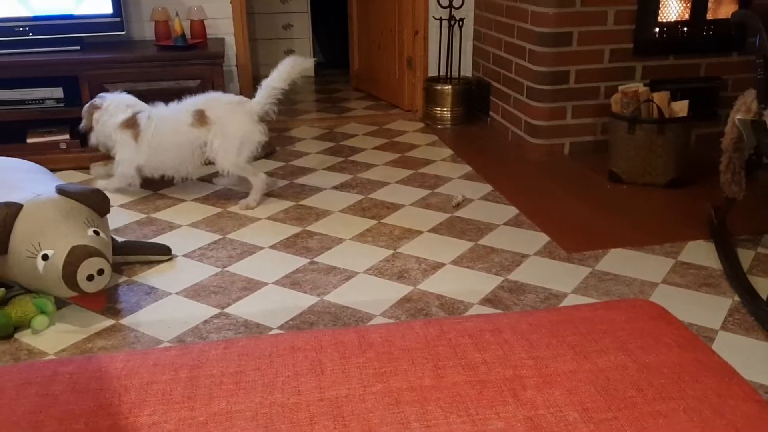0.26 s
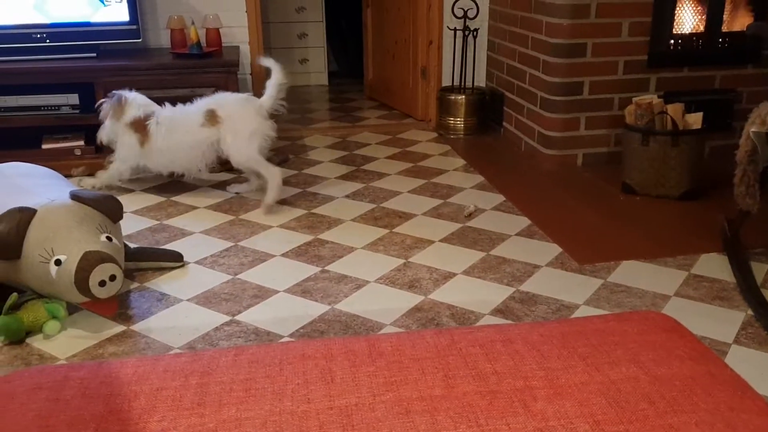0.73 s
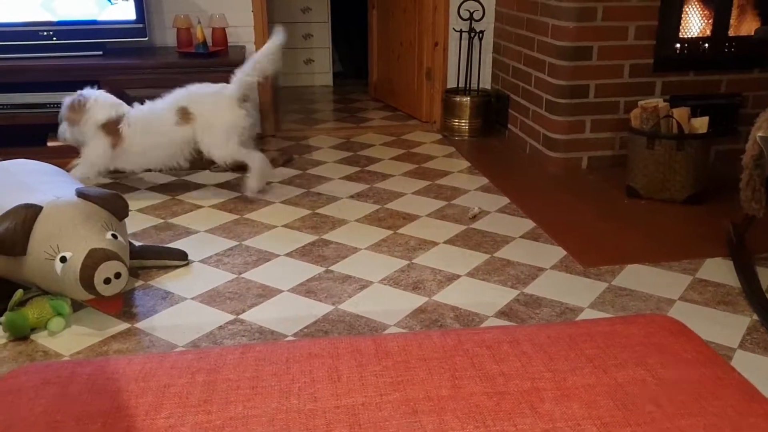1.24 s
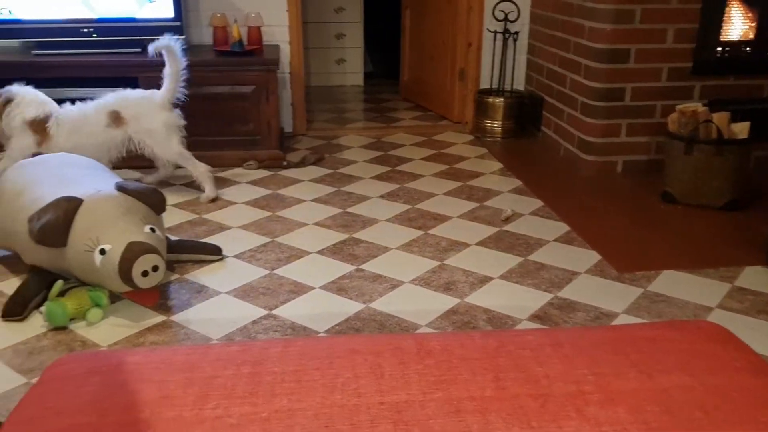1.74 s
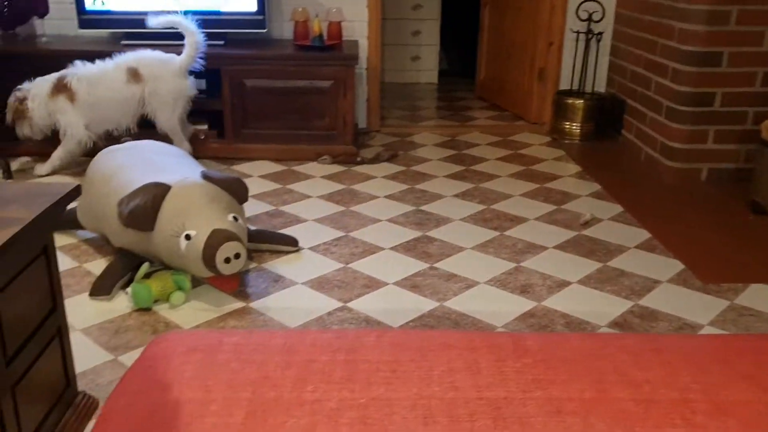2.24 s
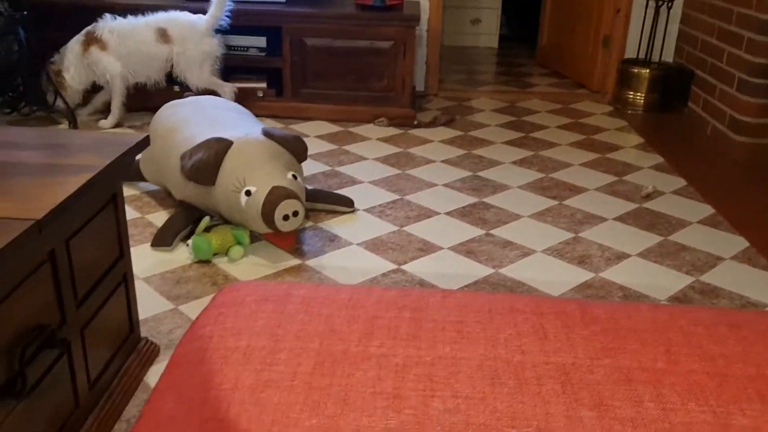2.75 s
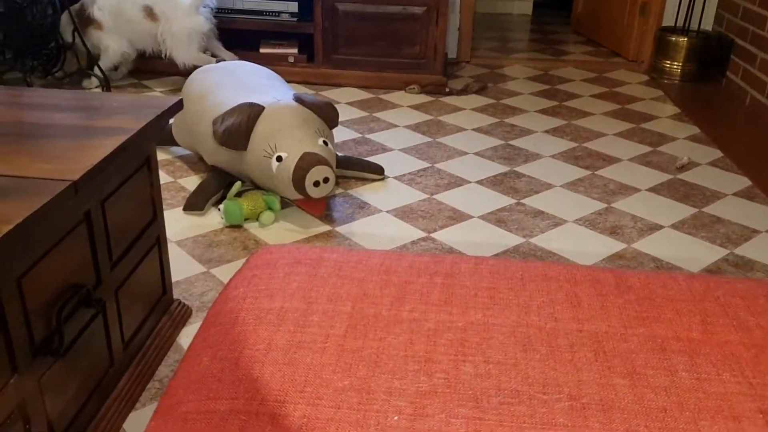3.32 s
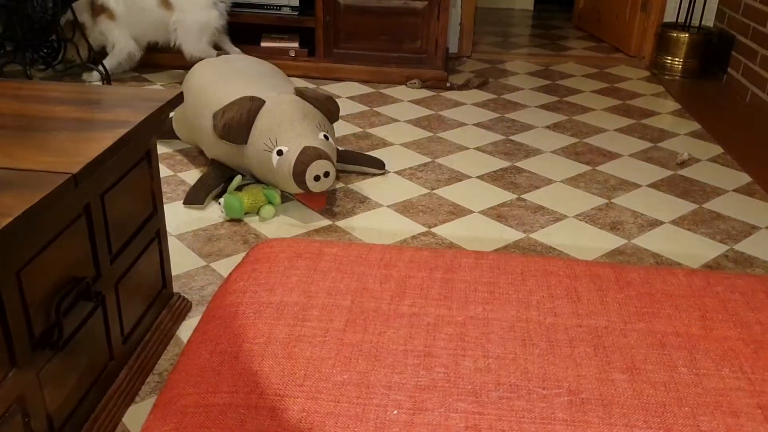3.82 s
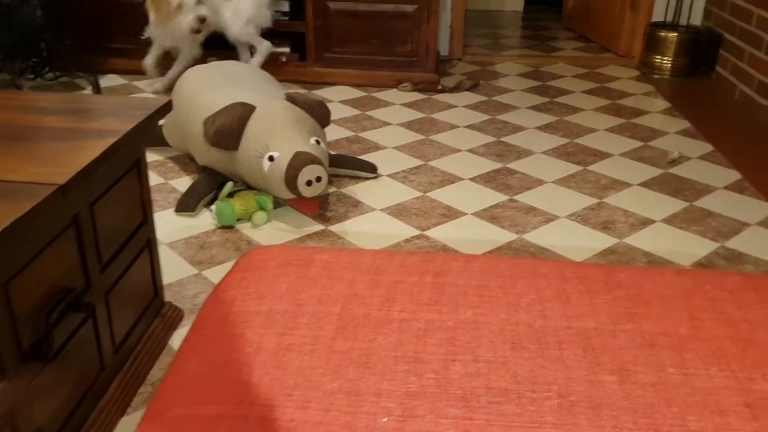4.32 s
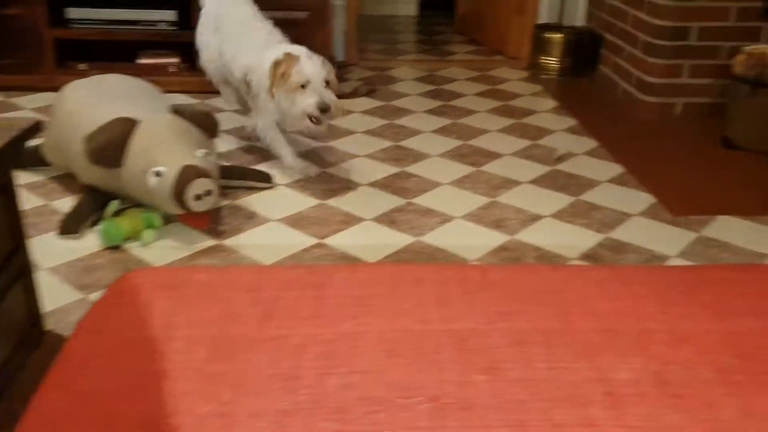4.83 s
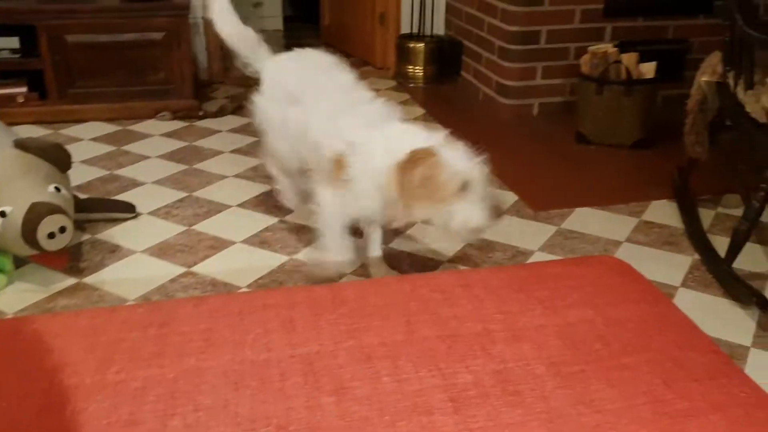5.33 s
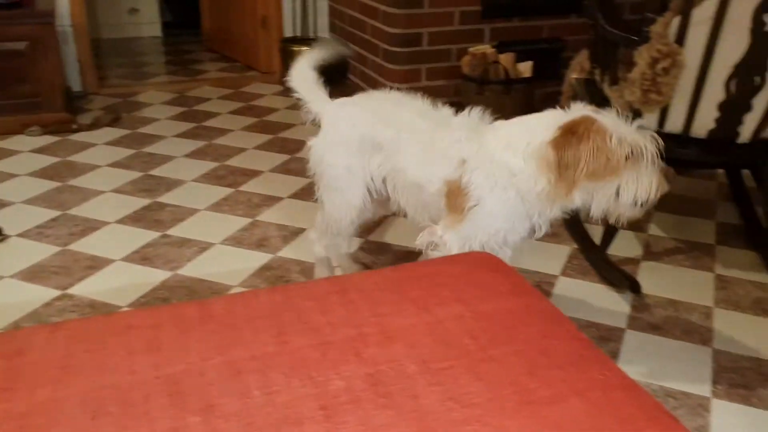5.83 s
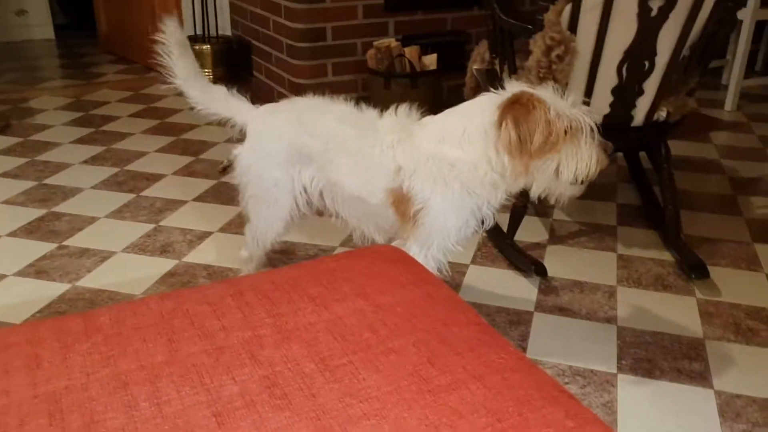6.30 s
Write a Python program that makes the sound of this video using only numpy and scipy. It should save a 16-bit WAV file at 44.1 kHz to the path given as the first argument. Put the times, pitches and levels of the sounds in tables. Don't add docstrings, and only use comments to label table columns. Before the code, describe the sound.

A small dog runs about on a tiled living-room floor, heard by a handheld phone. Claws rattle at once; at 0.3 s a scrabble and pad slap meet a hollow furniture knock, and near 0.7 s comes the hardest wooden thud with bright nail ticks, its panels ringing briefly. Smaller clicks and sliding scrapes follow from 0.85 to 1.8 s, with a low floor bump around 1.2 s and sharper claw taps at 1.9 s. A lighter knock and slap land at 2.04 s. From 2.2 to 4.4 s the steps grow sparse, soft and dull, with a tiny spark snap near 3.2 s. At 4.53-4.63 s a tight burst of claws skitters, followed by a low handling bump. Faint pats fade after 5.5 s into near silence. The bare walls ring for under half a second over a barely audible stove rumble and hiss.

```python
import sys
import numpy as np
from scipy import signal
from scipy.fft import rfft, irfft
from scipy.io import wavfile
from scipy.ndimage import uniform_filter1d

SR = 44100
rng = np.random.default_rng(int(sys.argv[2]) if len(sys.argv) > 2 else 0)


def dump(signal):
    limited = np.clip(np.atleast_2d(signal).T, -1, 1)
    pcm = np.round(limited * 32767).astype(np.int16)
    wavfile.write(sys.argv[1], SR, pcm)


def voltage_ratio(decibels):
    exponent = np.asarray(decibels, float) / 20
    return 10 ** exponent


N = 289408

# frequency in Hz, level in dB per Hz.
AIR = [(15, -50), (25, -13), (66, -17), (97, -2.5), (200, -15.5), (405, -27.5), (531, -47.5), (624, -32.5),
       (1330, -41.5), (3620, -42), (9070, -44.5), (14400, -40), (16000, -50.5)]
AIR_DB = -46.5
STOVE_HZ, STOVE_DB = 84.7, -59.5

# time in s, peak in dB, low edge in Hz, build-up in ms.
BUMPS = [(0.009, -41.5, 80.6, 32), (1.197, -37, 55.15, 30), (1.449, -43.5, 89.4, 130), (1.684, -39, 50, 79),
         (1.919, -45.5, 218, 49.6), (4.61, -44.5, 146.8, 23), (5.188, -45.5, 85.3, 47),
         (.35, -29.5, 150, 20)]
BUMP_TOP_HZ = 347.1
# time in s, peak in dB, low edge in Hz, build-up in ms.
GRIP = [
    (4.75, -25.5, 27.93, 58),
    (5.2, -35, 30.2, 41),
]
GRIP_TOP_HZ = 54.7

# time in s, peak in dB, sharpness in dB, ring in Hz, scrabble length in ms.
DASH = [(0.0095, -29.5, -16, 2760, 1.6), (0.0145, -32, -19, 2740, 1.7), (0.0192, -28.5, -24, 2590, 2.2),
        (0.3185, -28, -7, 2300, 9.5), (0.3303, -18.5, 2, 2380, 13.5), (0.4654, -33.5, -0.5, 2840, 4.9),
        (0.4876, -23.5, 1, 2350, 3.4), (0.4968, -31, -0.5, 2440, 9.8), (0.6540, -33.5, 7.5, 3020, 5),
        (0.6609, -26.5, 6, 2130, 5.5), (0.6875, -13, 0, 2520, 4.4), (0.696, -16, -3, 2518, 2.8),
        (0.8446, -22, -10, 2510, 13), (0.857, -25.5, -10.5, 2230, 8), (0.8619, -31, 4.5, 3100, 2.7),
        (0.9732, -29.5, 1, 2630, 2.7), (1.055, -33, -3, 2970, 4), (1.0596, -27.5, -13, 3200, 3.4),
        (1.1216, -36.5, -17, 3020, 8.2), (1.1746, -39, 1.5, 2670, 26), (1.2705, -30.5, -4, 3120, 2.9),
        (1.2750, -43, 0, 3000, 4.5), (1.336, -39, -15, 2600, 6), (1.4920, -38, -2.5, 2600, 1.2),
        (1.5722, -37.5, 3, 3160, 3), (1.5778, -36, -7, 2150, 2.8), (1.6409, -35.5, -23, 2860, 3.2),
        (1.7220, -34.5, -6.5, 2900, 10), (1.7678, -40, 12.5, 2750, 11), (1.7870, -33.5, 6.5, 2080, 1.6),
        (1.796, -34, 5.5, 2390, 4), (1.8715, -35.5, 6, 2400, 2.1), (1.8771, -31.5, -10, 2460, 4),
        (1.9080, -19, -5, 2660, 2.5), (2.0278, -29, 3, 2840, 1.2), (2.1915, -32, -1, 2820, 1.4)]
# time in s, peak in dB, sharpness in dB, ring in Hz, scrabble length in ms.
WANDER = [(2.3204, -35.5, 0.5, 2580, 2), (2.538, -44, 8, 2750, 11), (2.7806, -51.5, 0, 2430, 3.5),
          (2.7875, -49, 0.5, 2470, 5), (2.96, -51, -4, 2750, 13), (3.3046, -64.5, 8, 3830, 12),
          (3.5024, -45.5, 0, 2450, 19), (3.6564, -58, 10, 2990, 5.6), (4.059, -56.5, 1, 2730, 5),
          (4.0691, -60, 7.5, 3300, 7.6), (4.1683, -63, 14.5, 3260, 60), (4.535, -31.5, -3, 2820, 9.9),
          (4.5465, -30.5, -4, 3160, 23), (4.5896, -28, 5.5, 2800, 5.3), (4.598, -24, -3, 2840, 8.9),
          (4.611, -32, 3.5, 2780, 8.4), (4.9974, -70.5, 10.5, 2800, 9.5), (5.0114, -70, 12, 2870, 8),
          (5.2222, -45.5, 0.5, 2660, 4), (5.3707, -81, -4.5, 2560, 7.3), (5.536, -55, 8.5, 2650, 14),
          (6.047, -68.5, 9.5, 2976, 13)]
FIRST_NAIL, FIRST_NAIL_MS = .3, 3.
SCRAPE_MS = 3.7
TIP_OVER_HORN = 1.4
BRIGHT_DB, BRIGHT_FOLLOWS = -7.5, 0.29
AIRY_DB, AIRY_FOLLOWS = -17.5, 0.95
HIDDEN_S, HIDDEN_AIRY_DB = (2.15, 4.4), -11

# start of the
# hold in s, time held in s, hiss in dB, sharpness in dB.
SLIDES = [(0.01, 0.0066, -42, 7.5), (0.478, 0.039, -37.5, 5.5), (0.55, 0.4, -45, -6),
          (0.93, 0.11, -43.5, -3.5), (1.05, .25, -45.5, -7), (1.502, 0.12, -56.5, 4),
          (1.649, 0.18, -45.5, 3), (1.919, 0.088, -41.5, 7.5), (2.002, 0.037, -40, -10),
          (2.09, 0.12, -46.5, -20), (2.2, 0.048, -49, 8), (2.33, 0.029, -48, -12.5),
          (2.57, 0.04, -57, -9.5), (2.748, 0.31, -66, 3), (3.178, 0.045, -54.5, 1.5),
          (3.26, 0.029, -61, -1.5), (3.529, 0.0072, -51, -3.5), (3.6, 0.046, -57.5, 3),
          (3.71, .02, -72.5, -26.5), (4.088, 0.0033, -62.5, -18), (4.182, 0.052, -71, -18),
          (4.519, 0.006, -50, 0), (4.68, 0.029, -46, -36), (4.907, 0.0084, -66.5, -19),
          (5.02, 0.11, -73, 6), (5.248, .01, -52.5, -6.5), (5.378, 0.013, -59, -27),
          (5.55, 0.02895, -58.5, 2.5), (5.939, .03, -82, -13.5), (6.05, .05, -73, 8),
          (0.142, 0.22, -58.5, 9.5), (1.36, 0.11, -52.5, 1.5), (1.85, 0.042, -51, -14),
           (2.42, .06, -74, -10), (2.62, 0.046, -77.5, -2), (3.519, .03, -67, -17.5),
           (4.26, .07, -66.5, 10.5), (4.33, 0.043, -85, -16), (4.46, 0.041, -60, 8), (4.83, 0.066, -62, 18),
           (5.01, 0.053, -66.5, 20.5), (5.11, 0.061, -71, -6), (5.3, 0.051, -69.5, -8.5),
           (5.57, 0.044, -73, -4.5), (4.85, 0.04, -60.5, -26), (4.06, 0.037, -64, 2.5),
           (5.19, 0.0092, -71.5, 26), (5.621, 0.03, -69.5, 19.5), (6.44, 0.028, -83, -1.5),
           (1.1, .15, -66.5, 22), (1.33, .15, -69, 23), (1.5, .06, -63.5, 20), (1.62, .1, -76, 22),
           (4.7, .06, -69, 18), (3.2, .08, -65.5, -15)]
# frequency in Hz, level in dB per Hz.
TILE = [(760, -43.5), (1300, -10.5), (2520, -6.5), (2890, -11.5), (3310, -5.5), (7670, 3.5), (8790, -15),
        (16000, -34.5)]
SLIDE_RISE_DB_PER_S, SLIDE_FALL_DB_PER_S = 499, 194.5
RUB_DB, RUB_FOLLOWS = -5, 0.18
FUR_DB, FUR_FOLLOWS = -8, 0.69

# time in s, peak in dB, ring in Hz, build-up in ms.
PADS = [(0.016, -42, 1420, 5.14), (0.335, -13, 700, 27), (0.489, -24.5, 1650, 12),
        (0.543, -34.5, 1460, 8.9), (0.675, -18.5, 705, 19.6), (0.849, -37, 870, 8.1),
        (1.058, -34, 1640, 2.9), (1.174, -60, 1250, 1.7), (1.493, -38, 1430, 2.1), (1.574, -33.5, 1550, 10),
        (1.773, -33.5, 1580, 1.3), (1.907, -29.5, 1380, 34), (2.045, -19.5, 1290, 1.5),
        (2.196, -31, 1454, 3.4), (2.544, -41.5, 1617, 16), (2.784, -59, 1644, 22), (3.21, -54, 1106, 45),
        (3.51, -49.5, 1290, 6.5), (3.69, -48.5, 1004, 28), (4.073, -40, 1003, 7.7),
        (4.176, -43.5, 923, 9.6), (4.545, -31.5, 1350, 3.9), (4.594, -22, 1393, 19.6),
        (4.878, -43, 1290, 18), (4.908, -40.5, 624, 8.7), (5.059, -61, 1012, 15.4), (5.115, -54, 920, 4.3),
        (5.228, -41, 831, 3.7), (5.345, -39, 1253, 15), (5.543, -44, 785, 10.2), (5.925, -61, 877, 25)]
PAD_RING_WIDTH_HZ = 100
NEAR_S = 3.1

# time in s, peak in dB, ping in Hz.
TICKS = [(0.0181, -19.5, 2660), (0.3208, -28, 7100), (0.4878, -27, 7300), (0.653, -15, 6400),
         (1.0600, -19, 4770), (1.275, -37, 4700), (1.719, -38, 6000), (1.9085, -20.5, 4570),
         (2.025, -19, 4140), (2.193, -23.5, 3300), (2.322, -28.5, 4100), (2.5369, -28, 4800),
         (2.538, -35, 7040), (0.687, -15.5, 3930), (0.7224, -13, 2460), (1.4925, -50, 3530),
         (1.5720, -32, 4600), (2.7825, -42.5, 3660), (2.958, -49.5, 3550), (3.6576, -46, 4950),
         (4.5342, -33, 6900), (4.6205, -26, 4010), (4.588, -18, 4430), (5.2223, -42.5, 3100),
         (4.5433, -32, 3390), (4.561, -33, 3310), (4.601, -31, 4060), (4.612, -28, 4270),
         (4.6135, -23, 4500), (4.6303, -29, 4340), (0.6913, -16, 2430), (0.7, -18, 3130),
         (0.736, -22.5, 2480), (0.845, -25.5, 2800), (1.1216, -30, 4800), (1.0664, -41, 3200)]
TICK_WIDTH = .3
DIRECT_TICK = 0.56

# time in s,
# peak in dB, frequency in Hz, width in Hz, build-up in ms.
RINGS = [(0.329, -30, 450, 340, 4.3), (0.345, -29, 355, 43, 8.9), (0.352, -21, 670, 150, 7.3),
         (0.672, -26.5, 600, 300, 5), (0.691, -19, 1250, 440, 5.3), (0.693, -25, 3300, 280, 6),
         (0.696, -13.5, 900, 450, 7), (0.76, -35, 260, 63, 30), (0.9, -40.5, 260, 80, 30),
         (1.1, -42, 4100, 300, 4.8), (1.19, -29, 48, 30, 30), (1.205, -34, 138, 140, 8.6),
         (1.274, -35.5, 4900, 300, 6), (1.276, -35, 7360, 500, 6), (1.68, -25.5, 75, 58, 25),
         (2.036, -27.5, 700, 500, 3.2), (2.047, -24, 960.3, 166, 4), (2.05, -34, 1600, 150, 8),
         (2.075, -30, 600, 370, 16), (2.782, -53, 3600, 110, 11), (2.957, -53, 2410, 200, 8),
         (3.2, -56, 1400, 260, 20), (3.22, -51, 2160, 150, 20), (3.26, -56.5, 1080, 154, 12),
         (3.51, -57.5, 853, 400, 20), (4.55, -32, 1470, 200, 8), (4.597, -23, 2780, 160, 6),
         (4.599, -38, 7600, 600, 6.5), (4.601, -27.5, 4400, 890, 6.3), (4.62, -30, 7240, 560, 6),
         (4.725, -28, 40, 20, 29), (5.055, -47, 1040, 40, 35), (5.11, -49, 960, 50, 20),
         (5.22, -48, 2100, 500, 16), (5.36, -60, 2920, 1100, 26)]

# time in s, peak in dB, build-up in ms.
THUDS = [
    (0.341, -16, 11.6),
    (0.686, -9.5, 16.2),
    (2.043, -18.5, 7.8),
]
# frequency in Hz, width in Hz, level in dB.
HUMS = [
    [(242, 21, -9.5), (360, 6.2, 5.5), (700, 35, -7.0), (1265, 31, -17.0), (1380, 130, -6.0)] + [(481.5, 21, -2.5), (158, 28, -13.5), (810, 37, -4.0)],
    [(390, 18, -23), (565.0, 13, -9.5), (740, 79, 14), (1290, 51, -15.5)] + [(218, 27, -14.5), (970, 28, 1.0)],
    [(278.3, 11.3, 1.5), (400, 30.5, 12), (545, 190, 10), (705, 160, -5), (814, 45, -14), (1244, 64, -33)],
]
# frequency in Hz, level in dB, time to fall 60 dB in s.
PANELS = [
    [(154, -9, 0.13), (214.8, 3.5, 0.22), (272, -5.5, .25), (371, 5, .22), (569, -3, .3), (660, -2, .2),
     (706, -4.5, 0.25), (855, -6, 0.45)],
    [(206.5, -8.5, .25), (342, -21, 0.25), (527, -6, .25), (560, -6.5, 0.21), (708, 0.5, .35),
     (775.6, -5, 0.31), (1002, -3.5, 0.43), (1120, -10, 0.17)],
    [(238, -5.5, 0.25), (401.3, 4, 0.19), (576, -4, 0.19), (716, 0, 0.4), (854, -5, 0.2), (1296, -8, 0.14),
     (1650, -8.5, .2)],
]
PANEL_SWELL = 0.4
# distance in Hz, share of the level.
TWINS = [(0, 1), (23, .7), (-31, .5)]

# time in s, peak in dB, ring in Hz, build-up in ms.
MORE_STEPS = [(0.345, -22.5, 545, 21), (0.5, -23, 1687, 8.3), (0.543, -37, 1595, 9.6), (0.69, -41, 560, 12),
              (2.04, -33, 1670, 8), (0.69, -39, 2100, 7.3), (2.042, -28, 400, 11), (2.2, -42, 393, 37),
              (2.38, -51, 450, 20), (2.544, -39, 2290, 15), (2.57, -53.5, 716, 21), (2.783, -50.5, 1600, 12),
              (2.85, -56, 1607, 30), (2.955, -64, 1496, 8.4), (2.971, -57, 2576, 25), (3.52, -50, 496, 19),
              (4.18, -44.5, 910, 7.8), (4.24, -53.5, 900, 26), (4.95, -55, 640, 30), (5.055, -64, 1036, 20),
              (5.11, -68, 937, 16.6), (5.115, -57.5, 1600, 13), (5.228, -43, 1610, 5.2), (5.361, -45, 360, 15),
              (5.38, -44.5, 640, 17), (5.33, -43.5, 1675, 19), (5.56, -63, 1703, 17), (5.945, -67, 1200, 21)]
MORE_STEP_WIDTH_HZ = 105

# time in s, peak in dB.
SNAP = [
    (1.3962, -40),
    (3.1742, -37),
]

# frequency in Hz, time to fall 60 dB in s.
ROOM_T60 = [(100, 1), (400, 0.42), (1000, 0.45), (3000, 0.37), (7000, 0.36), (14000, 0.22)]
# delay in ms, level in dB.
ECHOES = [(2.2, -10), (5.5, -4), (9.5, -5), (14, -9), (21, -11)]
# time in s, left over right in dB.
PAN = [(0.0, 3), (0.99, 2), (1.421, 2.5), (2.299, 2.5), (2.589, 3), (4.15, 2.5), (4.219, 2), (6.19, 2),
       (6.56, 4.5)]
# frequency in Hz, level in dB.
MIC = [(60, -18.5), (150, 5.5), (1600, 1), (2000, -5.5), (2500, 0.5), (5000, 3), (6200, 0.5), (7600, 2.5),
       (8900, -1), (10500, 2), (13000, 4.5), (15800, -5.5)]
LEFT_LEAD_S = .00014
PORT_GAP_M = .15
ROOM_LEFT_DB = 1.5
SUPPRESSION_DB = 7.
CUTOFF_HZ = 16200


def rms_one(x):
    return x / np.sqrt(np.mean(x ** 2) + 1e-30)


def at_hz(points, hz):
    table_hz, values = np.transpose(points)
    return np.interp(np.log(np.maximum(hz, 1)), np.log(table_hz), values)


def colour(x, points):
    hz = np.fft.rfftfreq(x.shape[-1], 1 / SR)
    return irfft(rfft(x) * voltage_ratio(at_hz(points, hz)), x.shape[-1])


def two_ports(size):
    alike = .98 * np.sinc(2 * np.fft.rfftfreq(size, 1 / SR) * PORT_GAP_M / 343)
    mid, side = rfft(rng.standard_normal((2, size)))
    spectra = np.sqrt(1 + alike) * mid + np.sqrt(1 - alike) * side * [[1], [-1]]
    return rms_one(irfft(spectra, size))


def band(x, low_hz, high_hz):
    return signal.sosfilt(signal.butter(2, [low_hz, high_hz], "band", fs=SR, output="sos"), x)


def resonate(x, hz, width_hz):
    r = np.exp(-np.pi * width_hz / SR)
    feedback = [1, -2 * r * np.cos(2 * np.pi * hz / SR), r * r]
    return signal.lfilter((1 - r * r) / 2 * np.array([1, 0, -1]), feedback, x)


def grains(size, per_s, spread_db):
    sizes = voltage_ratio(spread_db * np.minimum(rng.exponential(1, size), 4)) * rng.choice([-1, 1], size)
    return rms_one(sizes * (rng.random(size) < per_s / SR))


def push(ms, per_s):
    t = np.arange(8192) * 1000 / SR / max(ms, 1)
    return grains(len(t), per_s, spread_db=3) * t * np.exp(-1.5 * t)


def place(out, s, sound, db):
    i = max(round(s * SR), 0)
    full = out.copy()
    full[i:i + len(sound)] += (voltage_ratio(db) * sound / np.sqrt(np.sum(sound ** 2)))[:N - i]
    return full


def still_room():
    draught = resonate(two_ports(N), STOVE_HZ, width_hz=36.0)
    draught = rms_one(resonate(draught, STOVE_HZ, width_hz=13.0))
    hiss = rms_one(colour(two_ports(N), AIR))
    return voltage_ratio(SUPPRESSION_DB) * (voltage_ratio(STOVE_DB) * draught + voltage_ratio(AIR_DB - 15.5) * hiss)


def room_answer(wet_db):
    size = 2 ** 15
    t = np.arange(size) / SR
    edges = 60 * 2 ** np.arange(0, 8.4, .75)
    diffuse, tail = [two_ports(size), two_ports(size)], 0
    for k, (low, high) in enumerate(zip(edges, edges[1:])):
        t60 = at_hz(ROOM_T60, np.sqrt(low * high))
        tail = tail + band(diffuse[k % 2], low, high) * voltage_ratio(-60 * t / t60)
    answer = tail * (1 - np.exp(-t / .004))
    answer = voltage_ratio(wet_db) * answer / np.sqrt(np.sum(answer ** 2) / 2)
    answer[[0, 1], [0, round(LEFT_LEAD_S * SR)]] += 1.2
    for ms, db in ECHOES:
        lags = (ms * SR / 1000 + rng.integers(0, 30, 2)).astype(int)
        answer[[0, 1], lags] += voltage_ratio(db) * rng.choice([-1, 1])
    return answer


def in_room(sound, wet_db):
    return signal.fftconvolve(sound[None], room_answer(wet_db), axes=1)[:, :N]


def bumps(spots):
    out = np.zeros((spots, N))
    for k, (s, db, low_hz, ms) in enumerate(BUMPS + GRIP):
        top_hz = BUMP_TOP_HZ if k < len(BUMPS) else GRIP_TOP_HZ
        bump = band(push(ms, per_s=1200.0), low_hz, top_hz)
        out[k % spots] = place(out[k % spots], s - .01, bump, db + 18.5)
    return out


def claws(spots):
    out, t = np.zeros((spots, N)), np.arange(4096) * 1000 / SR
    for k, (s, db, sharp_db, hz, ms) in enumerate(DASH + WANDER):
        fade = np.exp(-t / max(ms, .3)) * (.4 + .6 * np.minimum(1, t / 2.5))
        nails = grains(len(t), per_s=4000., spread_db=2.5) * fade
        nails[0] += FIRST_NAIL * min(1, FIRST_NAIL_MS / ms) * np.sqrt(np.sum(nails ** 2))
        scrape = 1.2 * rms_one(nails) + rms_one(push(SCRAPE_MS, per_s=47000.0)[:len(t)])

        knock = rms_one(resonate(nails, hz, width_hz=690.0)) + 0.4 * rms_one(band(nails, 1700, 3000))
        tip = rms_one(resonate(nails, TIP_OVER_HORN * hz, width_hz=1200.0))
        tick = rms_one(tip + 0.39 * rms_one(band(nails, 2900, 5500)))
        bright_db = BRIGHT_DB + BRIGHT_FOLLOWS * sharp_db
        tick += voltage_ratio(bright_db) * rms_one(band(scrape, 5060, 7700))
        hidden = HIDDEN_S[0] < s < HIDDEN_S[1]
        airy_db = AIRY_DB + AIRY_FOLLOWS * sharp_db + HIDDEN_AIRY_DB * hidden
        tick += voltage_ratio(airy_db) * rms_one(band(scrape, 9000, 12000))

        tick_db = db + sharp_db + 14.0 + 20 * np.log10(np.std(tick))
        out[k % spots] = place(out[k % spots], s - .0008, knock, db + 19.0)
        out[k % spots] = place(out[k % spots], s - .0008, tick, tick_db)
    return out


def slide():
    t, gains = np.arange(0, N, 64) / SR, 0
    for s, held_s, db, sharp_db in SLIDES:
        rise_db, fall_db = SLIDE_RISE_DB_PER_S * (t - s), SLIDE_FALL_DB_PER_S * (s + held_s - t)
        shape_db = np.minimum(0, np.minimum(rise_db, fall_db))
        layers_db = np.array([[0], [RUB_DB - RUB_FOLLOWS * sharp_db], [FUR_DB + FUR_FOLLOWS * sharp_db]])
        gains = gains + voltage_ratio(db - 10.5 + layers_db + shape_db)
    grit = grains(N, per_s=3300.0, spread_db=3.0)
    hiss = rms_one(band(colour(grit, TILE), 1400, 3500))
    rub = rms_one(band(grains(N, per_s=300.0, spread_db=4.0), 180, 2800))
    time = np.arange(N) / SR
    shade = voltage_ratio(HIDDEN_AIRY_DB * ((time > HIDDEN_S[0]) & (time < HIDDEN_S[1])))
    fur = rms_one(band(grit, 3600, 7800)) + 0.55 * shade * rms_one(band(grit, 8500, 16000))
    return sum(np.interp(time, t, gain) * layer for gain, layer in zip(gains, [hiss, rub, fur]))


def pads(spots):
    out = np.zeros((spots, N))
    for k, (s, db, hz, ms) in enumerate(PADS):
        slap = push(ms, per_s=4000.0)
        ring = resonate(resonate(slap, hz, PAD_RING_WIDTH_HZ), hz, PAD_RING_WIDTH_HZ)
        pat = (1.05 if s < NEAR_S else 1.9) * rms_one(band(slap, 0.54 * hz, 1.5 * hz))
        out[k % spots] = place(out[k % spots], s - .003, rms_one(ring) + pat, db + 12.5)
    return out


def ticks():
    out, tap = np.zeros(N), np.arange(300) == 0
    for s, db, hz in TICKS:
        ping = resonate(resonate(tap, hz, TICK_WIDTH * hz), hz, TICK_WIDTH * hz)
        out = place(out, s, ping, db + 4.5)
    return out


def rings():
    out = np.zeros(N)
    for s, db, hz, width_hz, ms in RINGS:
        ring = resonate(resonate(push(ms, per_s=6000.0), hz, width_hz), hz, width_hz)
        out = place(out, s - .003, ring, db + 16.5)
    return out


def thuds(spots):
    out = np.zeros((spots, N))
    for k, ((s, db, ms), hums) in enumerate(zip(THUDS, HUMS)):
        blow = push(ms, per_s=1600.0)
        hum = sum(voltage_ratio(level_db) * resonate(blow, hz, width_hz + 45) for hz, width_hz, level_db in hums)
        knock = rms_one(hum) + .7 * rms_one(band(band(blow, 300, 1900), 200, 2500))
        out[k] = place(out[k], s - .006, knock, db + 15.5)
    return out


def panels():
    out, t = np.zeros(N), np.arange(SR // 2) / SR
    for (s, db, ms), modes in zip(THUDS, PANELS):
        ring = 0
        for hz, level_db, t60 in modes:
            for apart_hz, share in TWINS:
                tone = np.sin(2 * np.pi * ((hz + apart_hz) * t + rng.random()))
                ring = ring + voltage_ratio(level_db - 60 * t / t60) * share * tone
        swell = 1 - np.exp(-(t * 1000 / (PANEL_SWELL * ms)) ** 2)
        i = round(s * SR)
        out[i:i + len(t)] += voltage_ratio(db - 14) * ring * swell
    return out


def more_steps():
    out = np.zeros(N)
    for s, db, hz, ms in MORE_STEPS:
        ring = resonate(resonate(push(ms, per_s=3800.0), hz, MORE_STEP_WIDTH_HZ), hz, 2 * MORE_STEP_WIDTH_HZ)
        out = place(out, s - .003, ring, db + 16)
    return out


def snap():
    out, click = np.zeros(N), band(np.arange(200) == 0, 1200, 12000)
    for s, db in SNAP:
        out = place(out, s, click, db + 6)
    return out


def scene():
    sources = bumps(spots=5) + claws(spots=5) + pads(spots=5) + thuds(spots=5)
    nail_ticks = ticks()
    sources[4] += slide()
    sources[3] += nail_ticks
    heard = sum(in_room(x, wet_db=3.0) for x in sources)
    heard += in_room(more_steps(), wet_db=1.0) + in_room(rings(), wet_db=-4.0)
    heard += snap() + panels() + DIRECT_TICK * nail_ticks
    heard = colour(heard, MIC)
    left_right = np.array([[1], [-1]])
    pan_db = np.interp(np.arange(N) / SR, *np.transpose(PAN))
    panned = heard * voltage_ratio(np.clip(pan_db, -6, 6) / 2 * left_right)
    return panned + still_room() * voltage_ratio(ROOM_LEFT_DB / 2 * left_right)


def low_pass(x):
    return signal.sosfilt(signal.butter(12, 16470, fs=SR, output="sos"), x)


def record(dry):
    cells = signal.stft(dry, nperseg=256)[2]
    power = uniform_filter1d(np.mean(abs(cells) ** 2, 0), size=5, axis=0)
    power = signal.lfilter([.12], [1, -.88], power, axis=1)
    steady = np.percentile(power, 8, axis=1, keepdims=True)
    gain = np.maximum(voltage_ratio(-SUPPRESSION_DB), 1 - 7.9 * steady / (power + 1e-20))
    quiet = signal.istft(cells * gain, nperseg=256)[1][:, :N]
    rounded = 1.15 * np.tanh(quiet / 1.15)
    mix = signal.sosfilt(signal.cheby2(24, 60, CUTOFF_HZ, fs=SR, output="sos"), rounded)
    return low_pass(mix)


dry = scene()
out = record(dry)
dump(out)
```